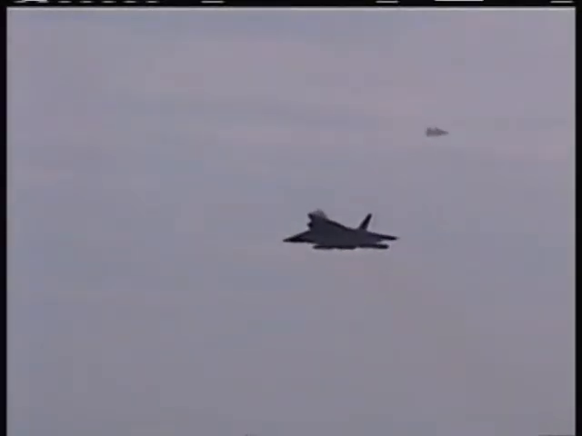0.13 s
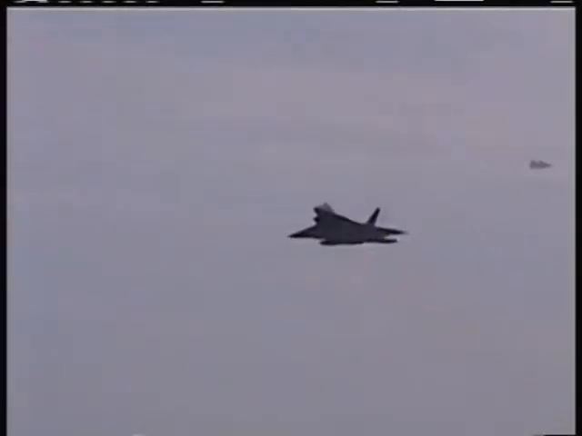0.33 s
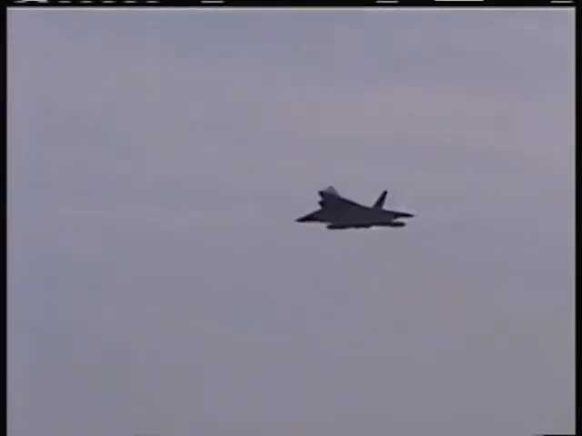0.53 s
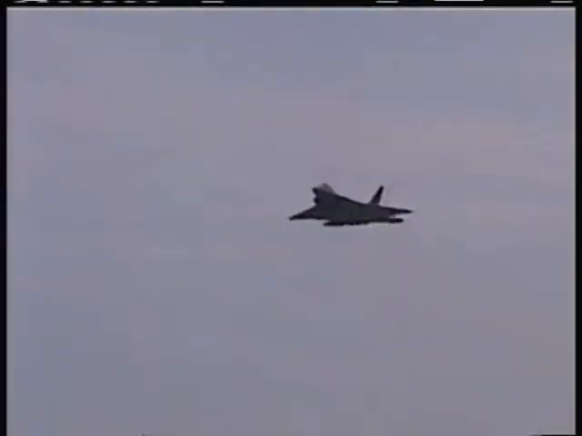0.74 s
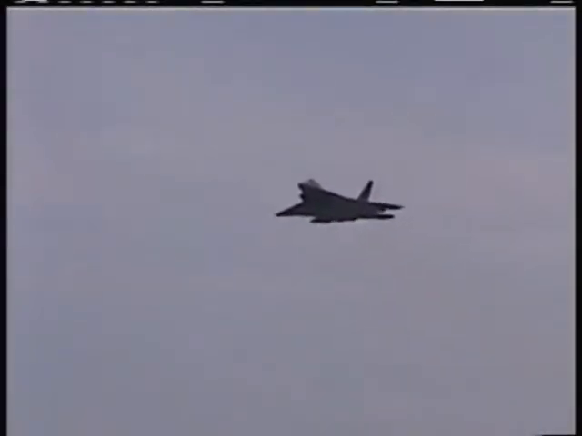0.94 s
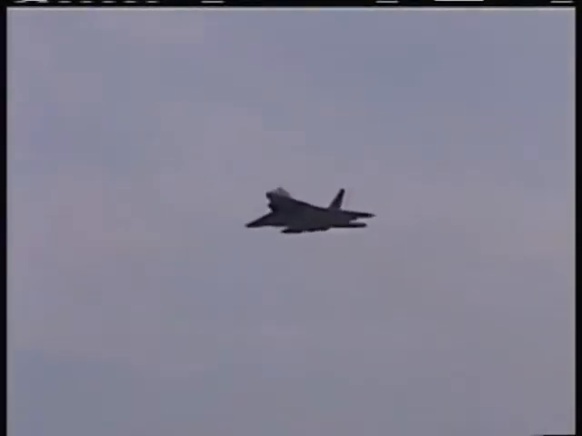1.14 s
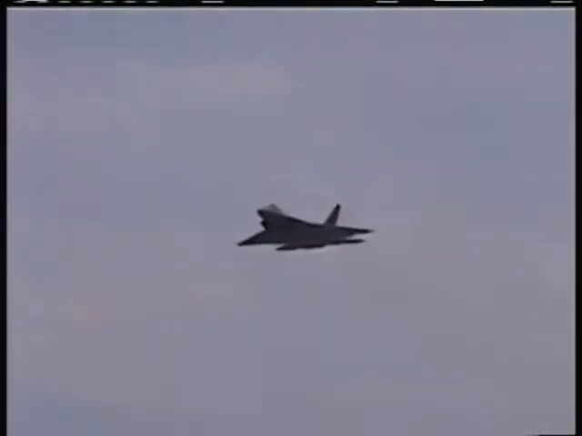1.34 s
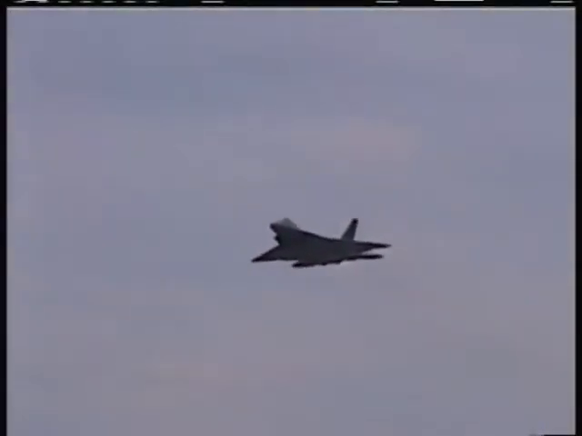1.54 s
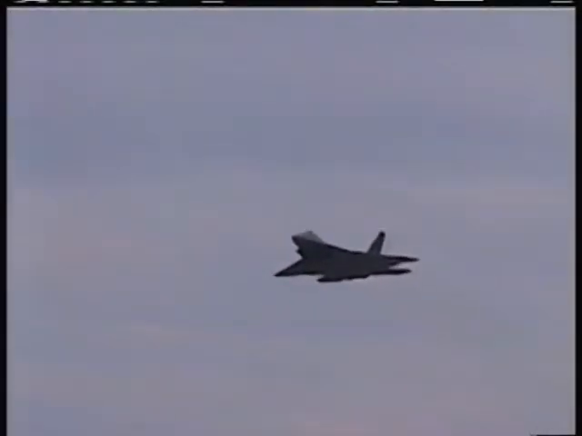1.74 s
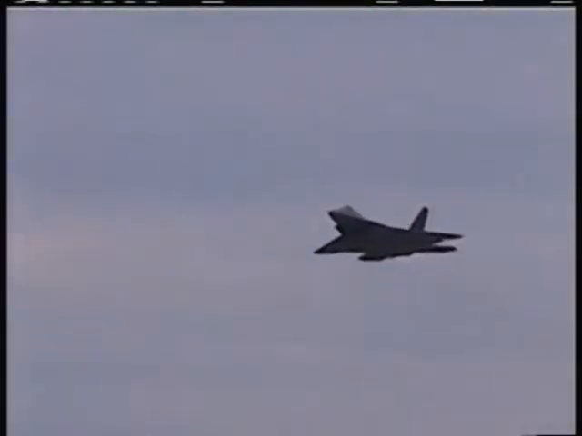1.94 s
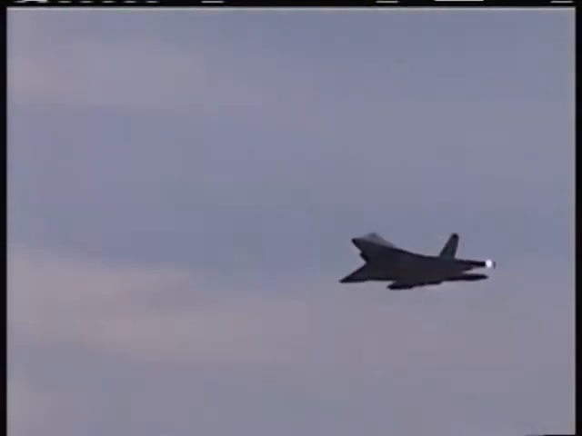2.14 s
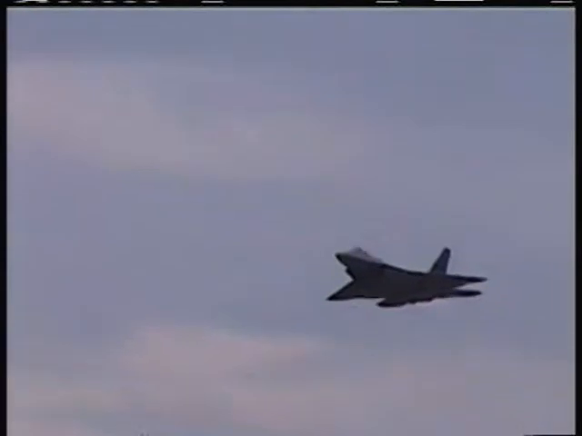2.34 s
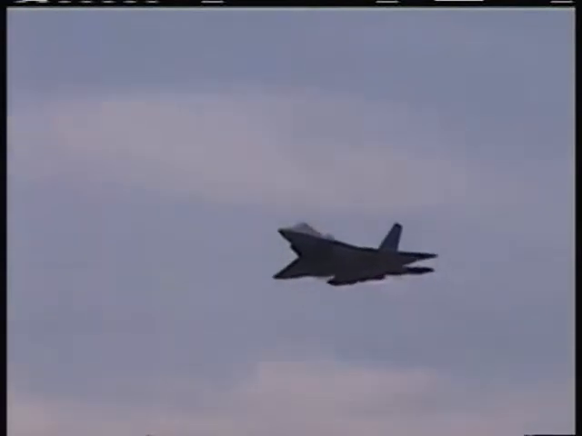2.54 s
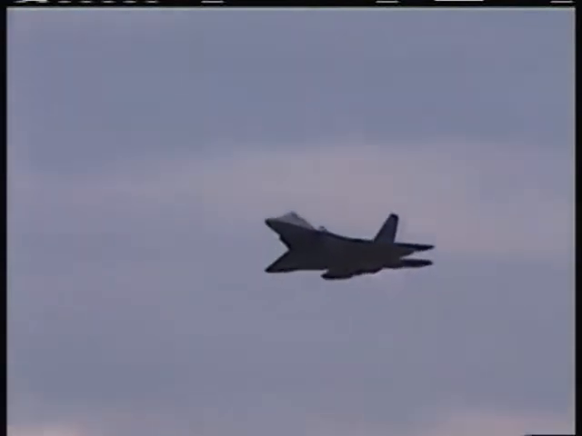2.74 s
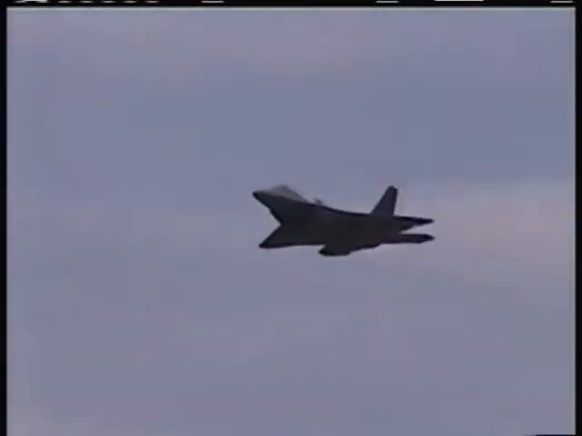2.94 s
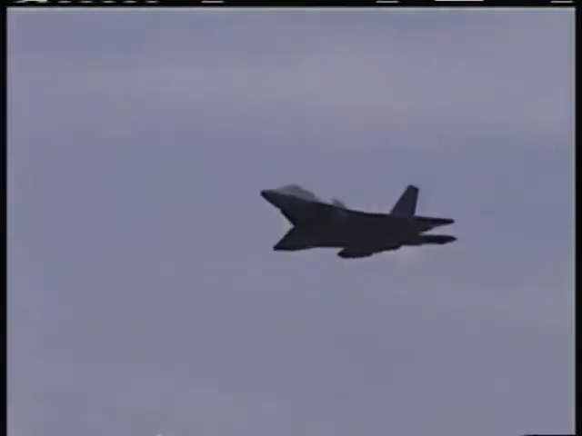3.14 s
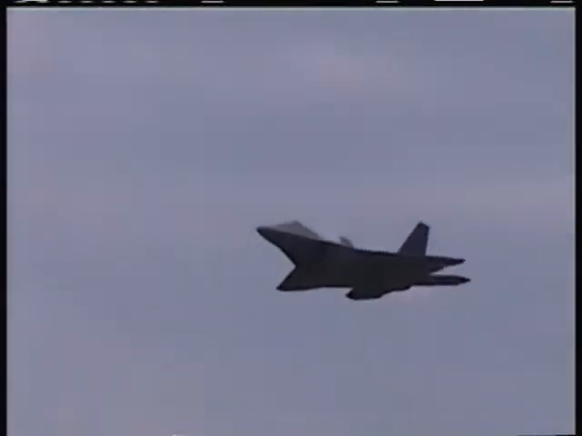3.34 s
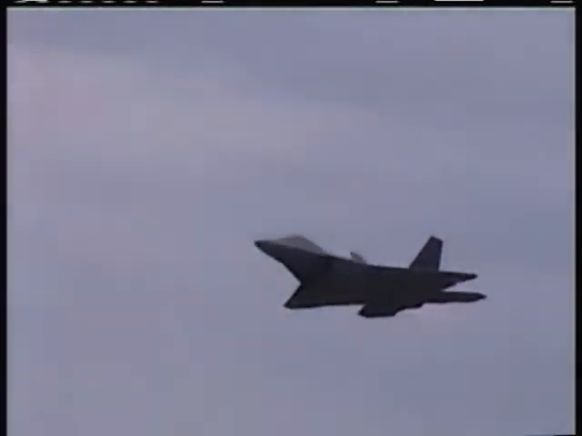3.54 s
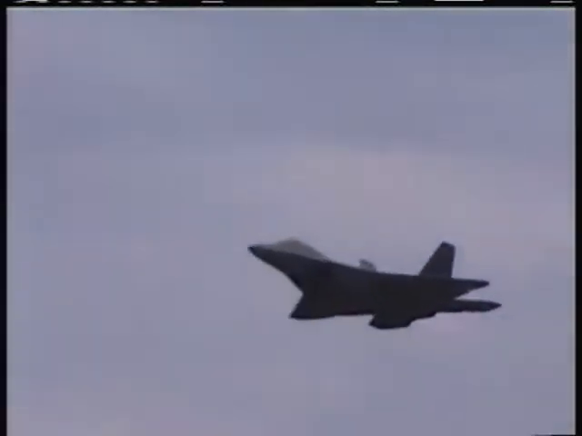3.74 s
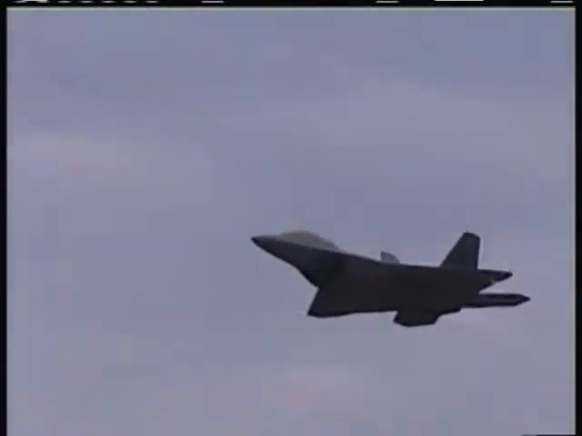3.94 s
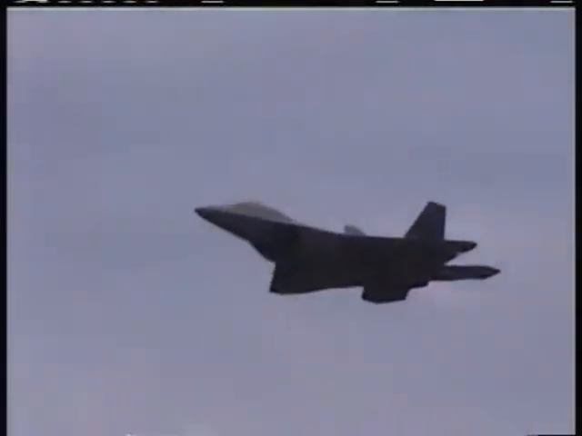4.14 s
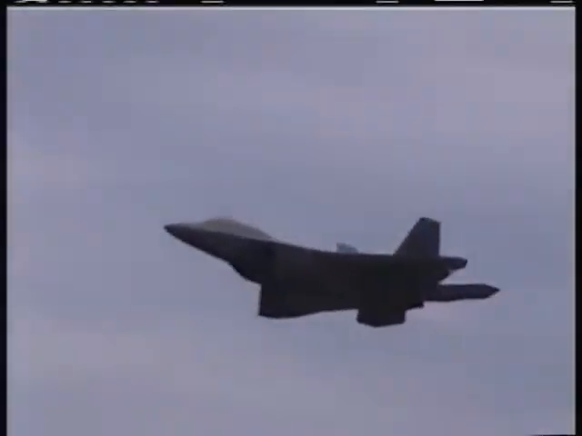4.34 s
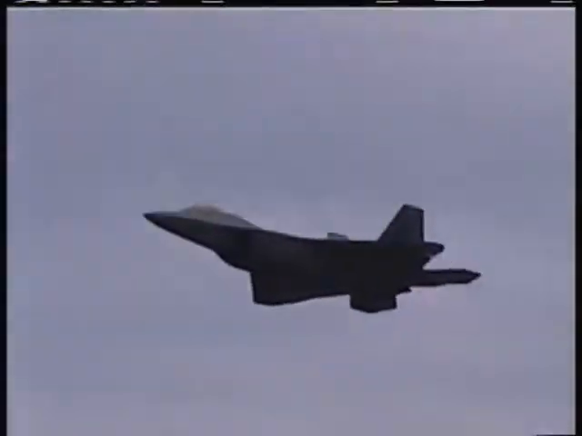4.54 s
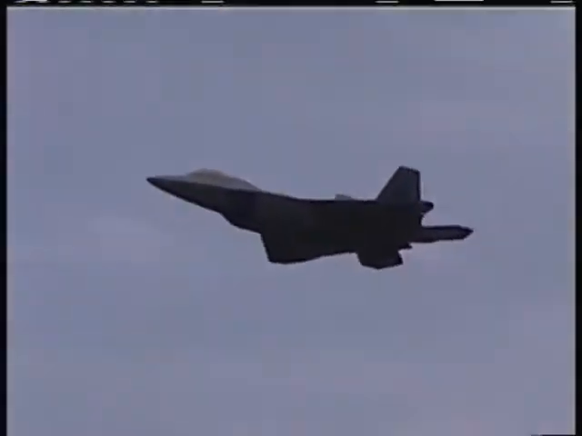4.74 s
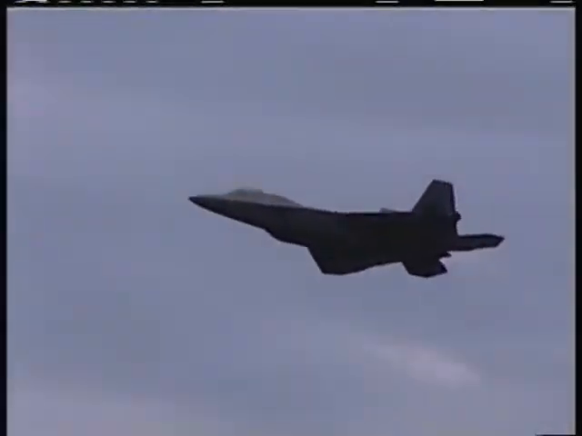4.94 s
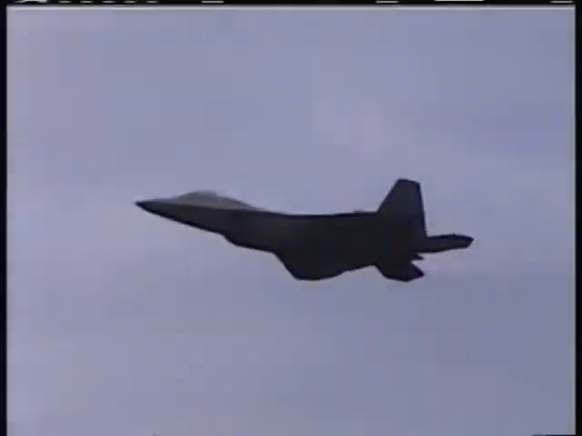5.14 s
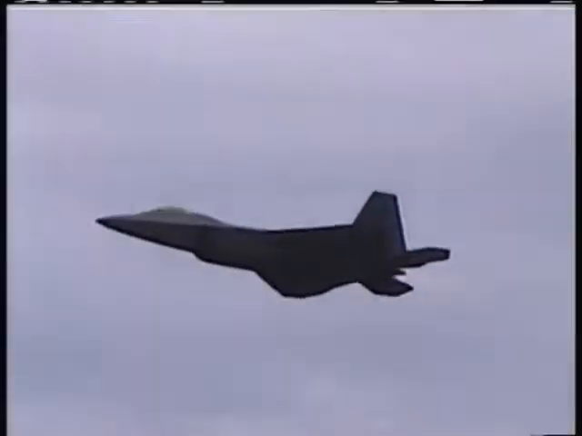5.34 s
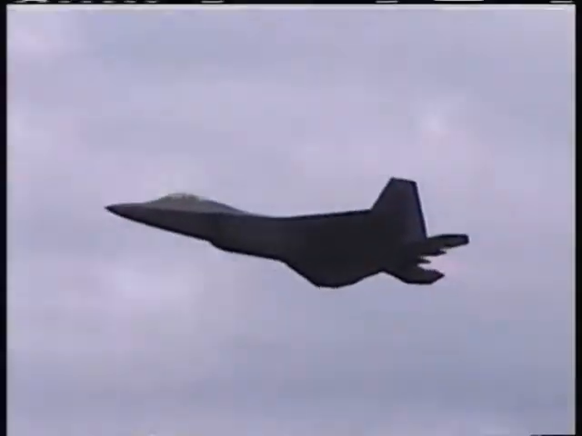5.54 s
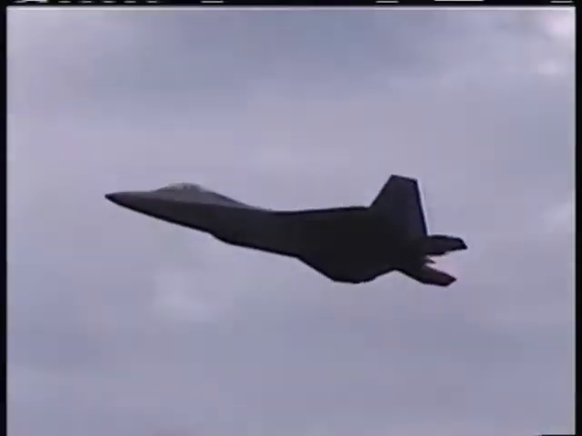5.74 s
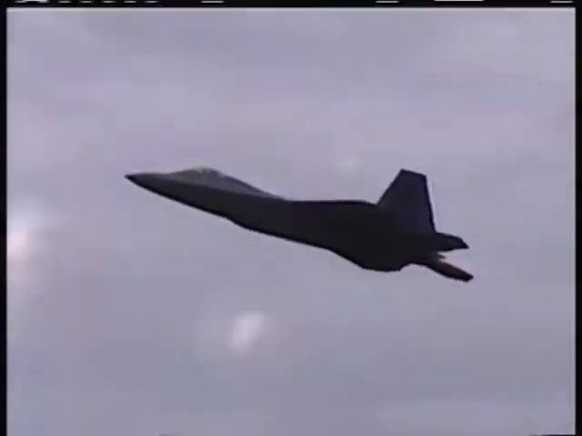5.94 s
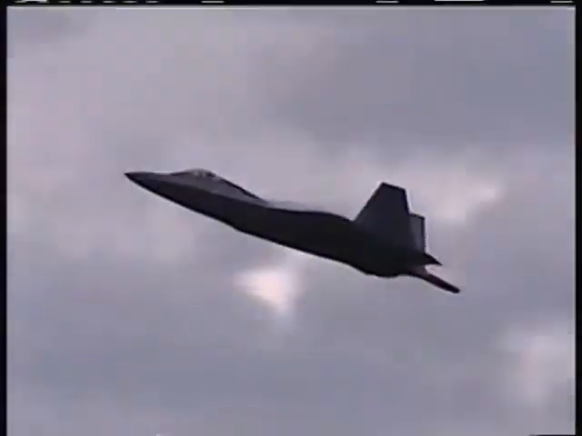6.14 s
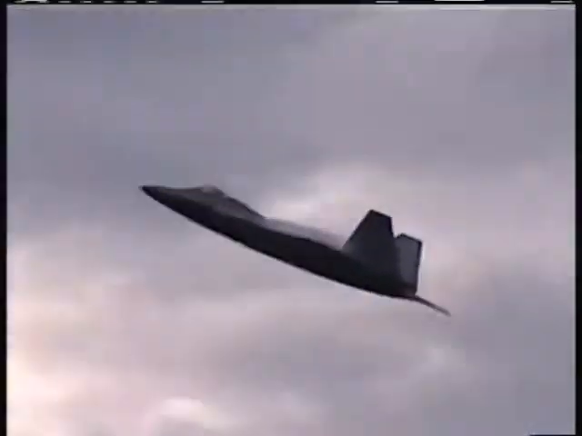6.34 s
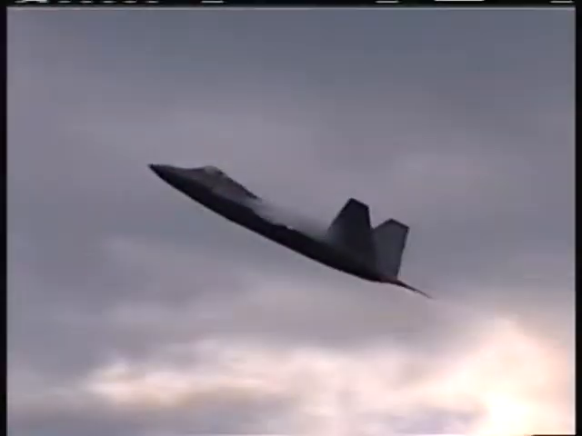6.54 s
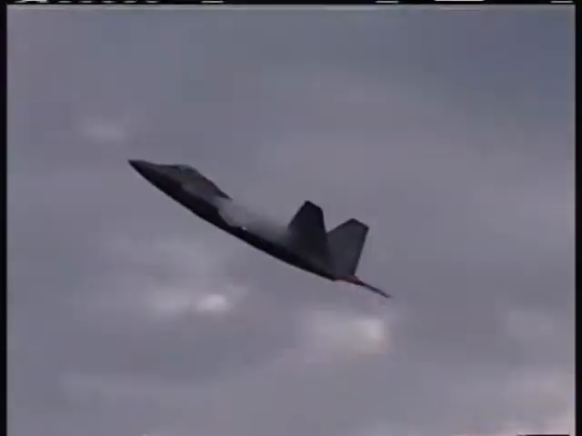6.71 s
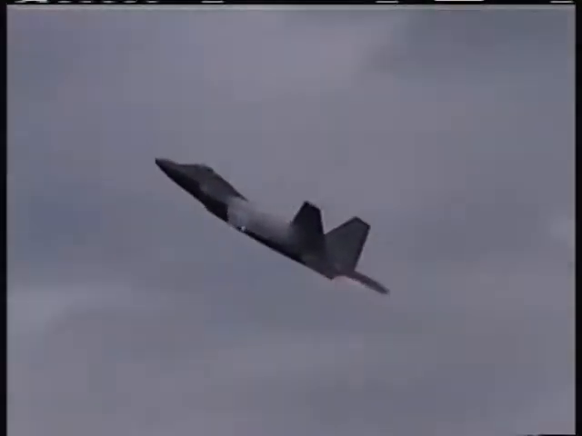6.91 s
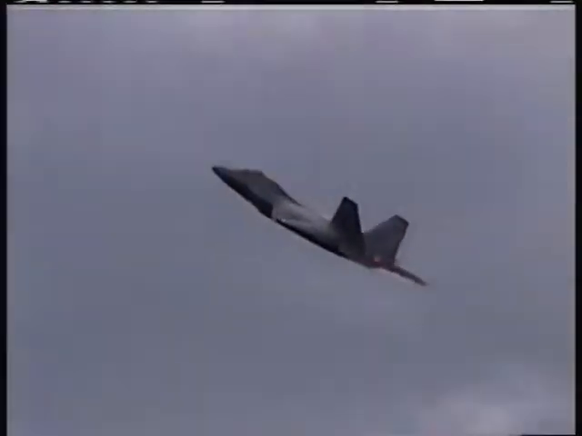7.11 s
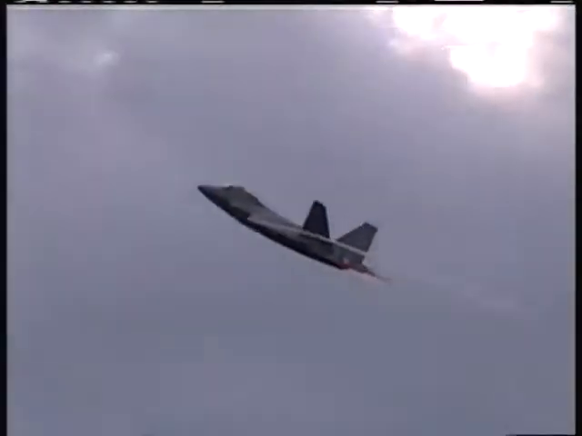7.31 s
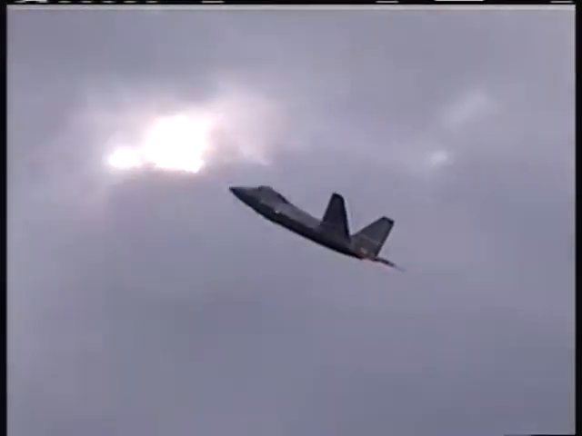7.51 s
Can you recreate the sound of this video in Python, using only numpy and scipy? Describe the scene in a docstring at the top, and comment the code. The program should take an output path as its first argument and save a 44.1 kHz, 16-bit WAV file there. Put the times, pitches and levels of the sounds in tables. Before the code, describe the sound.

Outdoors at an open airfield, a far jet roars dull and throbbing with hollow howling strands. Midway a nearer fighter takes over, its roar brightening with ragged crackles and hard pops as it approaches. It swells to a broad, hollow sweeping roar while pulling up, with low rumble and brief howls. Wind buffets the mono microphone at the beginning and end; faint hiss lies below.

```python
"""Two jets over an airfield

A jet fighter passes low and pulls up; a second, farther jet roars and fades behind it. Mixing noise and one-sided
shocks make each roar; the direct and ground-reflected waves interfere, so a comb of notches sweeps as the aircraft
climbs. Air absorbs the treble, turbulence makes it flicker, and shocks in the exhaust crackle. Howls and rumble are
narrow and low bands of noise; wind buffets the microphone, a bird whistles faintly, tape hiss and thin tones lie below.
"""
import sys
import numpy as np
from scipy import signal
from scipy.fft import rfft, irfft, next_fast_len
from scipy.io import wavfile
from scipy.ndimage import uniform_filter1d

SR = 44100
rng = np.random.default_rng(int(sys.argv[2]) if len(sys.argv) > 2 else 0)


def dump_mix(stems):
    """Bounce the given channels to the path in sys.argv[1] as a 16-bit WAV at rate SR."""
    frames = np.atleast_2d(stems).T  # one column per channel
    limited = np.clip(frames, -1, 1)  # hard clip at full scale
    pcm = np.round(limited * 32767).astype(np.int16)
    wavfile.write(sys.argv[1], SR, pcm)


def volts_from_db(level):
    """Convert decibel levels to linear amplitude ratios."""
    exponent = np.asarray(level, float) / 20
    return 10 ** exponent


N = 338247
SECONDS = np.arange(N) / SR


def rms_one(x):
    """Normalization: scales a signal to unit root-mean-square value."""
    return x / np.sqrt(np.mean(x ** 2) + 1e-20)


def in_time(rows):
    """Linear interpolation: turns the columns of a time table into one value per sample."""
    times, *columns = np.transpose(rows)
    return [np.interp(SECONDS, times, column) for column in columns]


def at_hz(points, hz):
    """Logarithmic frequency axis: reads a spectrum between its tabulated points."""
    table_hz, table_db = np.array(points).T
    return np.interp(np.log(hz + 1), np.log(table_hz), table_db)


def drift(corner_hz):
    """Low-pass random process: noise at every 40th sample through two equal poles, spread 1."""
    pole = np.exp(-2 * np.pi * corner_hz * 40 / SR)
    noise = rng.standard_normal(N // 40 + 2002)
    slow = signal.lfilter([1], [1, -2 * pole, pole ** 2], noise)[2000:]   # drop the settling
    return np.interp(np.arange(N) / 40, np.arange(len(slow)), rms_one(slow))


def band_noise(order, low_hz, high_hz):
    """Band-pass filtering: white noise confined between two frequencies, at unit rms."""
    band = signal.butter(order, [low_hz, high_hz], "bandpass", fs=SR, output="sos")
    return rms_one(signal.sosfilt(band, rng.standard_normal(N)))


def coloured(x, spectrum, low_hz, high_hz):
    """Spectral shaping: weights the spectrum of x so unit white noise has rms 1 between low and high."""
    size = next_fast_len(N)
    hz = np.fft.rfftfreq(size, 1 / SR)
    gain = volts_from_db(at_hz(spectrum, hz))
    inside = (hz > low_hz) * (hz < high_hz)
    gain = gain / np.sqrt(np.mean(gain ** 2 * inside))
    return hz, rfft(x, size) * gain


def through_air(hz, spectrum, band_db):
    """Frequency-dependent transmission: half-octave bands that add up flat each follow a level in time."""
    place, out = 2 * np.log2((hz + 1) / 44), 0
    for k in range(18):
        share = np.cos(np.pi / 2 * np.clip(place - k, -1, 1)) ** 2
        band = irfft(spectrum * share)[:N]
        out = out + band * volts_from_db(band_db(44 * 2 ** (k / 2)))
    return out


def off_ground(x, echo, dull_hz, waver_ms):
    """Two-path interference: direct sound plus a later, duller copy; unsteady air shakes lag and strength."""
    lag_ms, strength = in_time(echo)
    lag_samples = (lag_ms + waver_ms * drift(15)) * SR / 1000
    late = np.interp(np.arange(N) - lag_samples, np.arange(N), x)
    strength = np.clip(strength * (1 + .15 * drift(6)), 0, 1)
    soft = signal.filtfilt(*signal.butter(1, dull_hz, fs=SR), late)
    return (x + strength * soft) / np.sqrt(1 + strength ** 2)


def exhaust(per_s, spread_db, crackle_db):
    """Jet noise: turbulent mixing plus clumped one-sided shocks of uneven size, whose steep fronts rule the treble."""
    sizes = volts_from_db(spread_db * np.minimum(rng.exponential(1, N), 5))
    born = rng.random(N) < per_s * volts_from_db(5.5 * drift(14)) / SR
    pulses = sizes * born
    shocks = rms_one(signal.lfilter([1, -.8], [1], pulses - np.mean(pulses)))
    mixing = rng.standard_normal(N)
    return (mixing - volts_from_db(crackle_db) * shocks) / np.sqrt(1 + volts_from_db(crackle_db) ** 2)


# spectrum of the tape hiss: f/Hz, relative density/dB
HISS_SPECTRUM = [(3820, -21.5), (6500, 0), (7720, 1.5), (8280, 0), (15680, -0.5), (15780, -27)]


def tape_hiss():
    """Broadband noise: random magnetization heard as steady treble hiss."""
    noise = rng.standard_normal(N)
    hiss_db = -77.5   # rms between 7700 and 15000 Hz
    return volts_from_db(hiss_db) * irfft(coloured(noise, HISS_SPECTRUM, 7700, 15000)[1])[:N]


# thin steady tones of the electronics: f/Hz, rms level/dB
WHINE_TONES = [(15734, -95), (10790, -95), (10071, -99)]


def whine():
    """Superposition: pure tones of constant frequency and level add up."""
    return sum(np.sqrt(2) * volts_from_db(db) * np.sin(2 * np.pi * hz * SECONDS) for hz, db in WHINE_TONES)


# buffeting of the microphone, before its lumps: t/s, rms level/dB
WIND_LEVEL = [(0, -37.5), (.3, -41), (.42, -48.5), (.9, -51), (1.3, -56.5), (1.9, -70), (2.5, -63),
              (3.0, -67), (3.5, -61), (4.5, -66), (5.1, -60), (5.6, -50), (6.3, -45.5), (6.8, -48),
              (7.25, -45), (7.5, -42.5), (7.67, -36)]


def wind():
    """Flow noise: turbulent pressure at the microphone, a lumpy low band over a steady deeper one."""
    breeze_db, lumps_db, lumps_hz = -75, 2, 4.7
    breeze = volts_from_db(breeze_db) * band_noise(2, 22, 60)
    buffet_db = in_time(WIND_LEVEL)[0] + lumps_db * drift(lumps_hz)
    return breeze + volts_from_db(buffet_db) * band_noise(2, 62, 130)


# whistle of a faint small bird: t/s, f/Hz, rms level/dB
BIRD_WHISTLE = [(.445, 5300, -95), (.455, 5250, -74), (.48, 5100, -73), (.503, 4800, -74),
                (.512, 4700, -95), (.52, 4700, -140)]


def bird():
    """Frequency modulation: one thin falling whistle, its phase the integral of its frequency."""
    hz, level_db = in_time(BIRD_WHISTLE)
    started = SECONDS > BIRD_WHISTLE[0][0]
    phase = 2 * np.pi * np.cumsum(hz) / SR
    return started * np.sqrt(2) * volts_from_db(level_db) * np.sin(phase)


# longer bounce of the far jet and the rumble, before wavering: t/s, lag/ms, strength (0-1)
LONG_BOUNCE = [(0, 4, 0.07), (.4, 4.6, 0.4), (.9, 4.65, 0.94), (1.25, 4.2, 1), (1.7, 5.1, 0.3),
               (2.3, 5.23, 0.22), (5.5, 9.74, 0.3)]


def long_bounce(x, dull_hz, waver_ms):
    """Interference over a longer path: a low-passed late copy combs mainly the bass."""
    return off_ground(x, LONG_BOUNCE, dull_hz, waver_ms)


# deepest part of both roars, around 180 Hz, before its drift: t/s, level/dB
RUMBLE_LEVEL = [(0, -43), (.4, -48.5), (.7, -49), (1.6, -48.5), (2.1, -52.5), (2.5, -39.5), (2.7, -48),
                (3.7, -53), (4.3, -49.5), (4.65, -43), (5.1, -46), (6.0, -41), (6.5, -41), (6.9, -44),
                (7.35, -33), (7.67, -34)]


def rumble():
    """Scale of turbulence: large eddies far down the plumes give low noise, which takes the long bounce too."""
    eddies = long_bounce(band_noise(3, 125, 255), dull_hz=900, waver_ms=.05)
    return volts_from_db(in_time(RUMBLE_LEVEL)[0] + 2.3 * drift(7.3)) * eddies


# gliding strands, two early and two as the near jet pulls up, before wavering; each: t/s, centre f/Hz, rms level/dB
HOWL_STRANDS = [
    [(.05, 580, -66), (.15, 552.3, -33), (.35, 499, -34), (.6, 444.7, -34.5), (.85, 421.3, -34.5),
     (1.1, 443.3, -40), (1.32, 470, -35.5), (1.45, 485, -63)],
    [(0, 800, -55), (.08, 821, -41), (.2, 850, -34.5), (.32, 922, -45), (.45, 860, -53), (.6, 850, -39),
     (.75, 800, -53), (1.0, 830, -40), (1.2, 950, -44), (1.35, 950, -60)],
    [(5.45, 620, -60), (5.6, 579.6, -35), (5.85, 551.7, -36), (6.15, 563.7, -31.5), (6.35, 520, -28),
     (6.55, 495, -57)],
    [(6.4, 930, -57), (6.55, 879, -35), (6.7, 840, -34), (6.9, 880, -33), (7.1, 920, -38), (7.3, 948, -36),
     (7.5, 950, -50)],
]


def howls():
    """Quadrature modulation: low-passed noise pairs shifted to a moving centre make narrow, gliding roars."""
    width_hz, wobble_hz, flutter_db = 90, 10, 1.5   # the strands waver and break up
    out, low = 0, signal.butter(2, width_hz / 2, fs=SR, output="sos")
    for rows in HOWL_STRANDS:
        hz, level_db = in_time(rows)
        hz = hz + wobble_hz * drift(6)
        level_db = level_db + flutter_db * drift(9)
        a, b = signal.sosfilt(low, rng.standard_normal((2, N)))
        phase = 2 * np.pi * np.cumsum(hz) / SR
        out = out + volts_from_db(level_db) * rms_one(a * np.cos(phase) + b * np.sin(phase))
    return out


# far jet, before its throb: t/s, level at 450 Hz/dB, gain of the upper roar at 800 Hz/dB
FAR_LEVEL = [(0, -42.5, 0), (.12, -36, 6), (.35, -36.5, 2.5), (.6, -34, 3), (.85, -36, -3.5),
             (1.08, -38.5, 9.5), (1.3, -39, -1), (1.55, -41.5, 10.5), (1.85, -35.5, 1.5), (2.1, -36.5, -18),
             (2.3, -40, -7), (2.5, -33, -1.5), (2.9, -41.5, 7), (3.2, -40, 3.5), (3.4, -31, 2),
             (3.75, -36.5, 6.5), (3.95, -34, -2), (4.25, -35, -18), (4.65, -30.5, -10), (4.9, -55, 7)]
# its ground echo, before wavering: t/s, lag/ms, strength (0-1)
FAR_GROUND = [(0, 1.2, 0.13), (.25, 1.92, 0.75), (.55, 1.9, 1), (0.849, 1.96, 0.1), (1.301, 1.97, 0.93),
              (1.7, 2.45, 0.7), (2.05, 2.82, 0.64), (2.3, 2.15, 1), (2.6, 2.55, 0.75), (3.5, 2.43, 0.47),
              (4.0, 2.15, 0.35), (4.8, 2.16, 1)]
# its roar: f/Hz, relative density/dB
FAR_SPECTRUM = [(150, -32), (250, -14.5), (330, -1.5), (400, 3), (600, 0), (900, -4.5), (1320, -16.5),
                (4000, -34.5), (5200, -85.5)]


def far_jet():
    """Distant jet noise: a dull, throbbing roar with little crackle left, combed by two reflections."""
    level_db, upper_db = in_time(FAR_LEVEL)
    source = exhaust(per_s=500, spread_db=3.0, crackle_db=-12)
    throb_db = 1.0 * drift(1.5) + 2.33 * drift(25)

    def band_db(hz):
        """Level of one band: the upper roar enters above 500 Hz, and each band has its own flicker."""
        upper = np.clip(np.log2(hz / 500) * 4.5, 0, 1)
        return level_db + upper * upper_db + throb_db + 1.0 * drift(36)

    roar = through_air(*coloured(source, FAR_SPECTRUM, 330, 640), band_db)
    roar = off_ground(roar, FAR_GROUND, dull_hz=1300, waver_ms=0.092)
    return long_bounce(roar, dull_hz=800, waver_ms=0.037)


# the hardest shocks, as impulses before filtering: t/s, level/dB
HARD_SHOCKS = [(1.9718, -17), (2.8275, -23), (2.993, -20), (3.493, -27), (3.5114, -8), (3.615, -8.5),
               (3.6676, -11), (3.685, -11), (3.785, -11), (3.898, -5.5), (3.828, -14), (4.022, -10),
               (4.156, -14), (4.178, -14), (4.3, -16), (4.61, -14), (4.7, -10), (4.758, -6), (5.0343, -8),
               (5.33, -8), (5.6, -14), (5.7538, -5), (6.0856, -13), (6.981, -2)]


def hard_shocks():
    """Shock waves: each is a sudden drop in pressure, band-limited and rounded by the air."""
    clicks = np.zeros(N)
    clicks[[round(s * SR) for s, db in HARD_SHOCKS]] = -volts_from_db(np.array(HARD_SHOCKS)[:, 1])
    push = signal.sosfilt(signal.butter(2, [700, 3500], "band", fs=SR, output="sos"), clicks)
    return signal.sosfilt(signal.butter(4, 8000, fs=SR, output="sos"), push)


# treble flares and lulls; the one at 0.52 s is a brief tape dropout, applied to the near jet only:
# middle t/s, gain at 5 kHz/dB, length/s
TREBLE_FLARES = [(0.52, -21, 0.015), (1.978, 8, 0.016), (2.345, 1.5, .03), (2.536, 7.5, 0.037),
                 (2.686, -3.5, 0.1), (2.843, 9, 0.023), (3.073, -8, 0.11), (3.506, 14, 0.027),
                 (3.562, 5, .05), (3.65, 7, 0.1), (3.735, -1, 0.06), (3.86, -2, 0.045), (3.812, 5, 0.046),
                 (3.9, 2, 0.018), (4.646, -2.5, 0.097), (4.88, 1, 0.048), (5.042, 6.5, 0.022),
                 (4.04, 5, 0.038), (4.167, 3, 0.07), (4.326, -4, 0.041), (4.434, 4.5, 0.091),
                 (4.517, -8, 0.17), (4.73, 2.5, 0.12), (4.786, -2, 0.036), (5.325, 4.5, 0.035),
                 (3.23, 4, 0.044), (3.31, 1, .03), (3.45, 3, .03), (4.982, 2.5, 0.038), (5.198, 3.5, .04),
                 (5.401, -10, 0.024), (5.56, 4, 0.092), (5.762, 4, 0.022), (6.11, 4.5, 0.061),
                 (6.43, 5, 0.017), (6.493, -11, 0.031), (6.815, 3.5, 0.014), (6.94, -5, 0.085),
                 (7.363, 4.5, 0.041)]


def flares():
    """Amplitude modulation: treble flares and lulls rise and die as smooth humps; dB at 5 kHz over time."""
    t = np.arange(0, N + 40, 40) / SR
    humps = sum(db * np.exp(-(2 * (t - s) / length) ** 4) for s, db, length in TREBLE_FLARES)
    return np.interp(SECONDS, t, humps)


# gain patches of the near roar over time and pitch: middle t/s, centre f/Hz, gain/dB, length/s, width/octaves
ROAR_PATCHES = [(1.43, 1380, 2.5, 0.34, 0.82), (1.9, 1500, 7.5, 0.17, 0.64), (2.805, 1180, 16.5, .15, 1.3),
                (3.85, 1300, -11, 0.18, 0.42), (3.91, 2850, 4, 0.39, 0.36), (3.5, 1100, 8.5, 0.1, 1.5),
                (2.2, 2300, -3, .8, .6), (.3, 3000, 3, .9, .6), (6.3, 800, -3, .25, .4),
                (5.65, 290, -3, .5, .4), (4.55, 4000, 2, .4, .5), (4.15, 830, 2.5, .25, .7),
                (4.05, 5300, 2, .2, 0.65), (4.9, 6500, 1.5, 0.27, 0.73), (0.49, 600, 3, .3, .4),
                (4.33, 2800, -6.5, 0.06, 2.5), (4.04, 3200, 2.5, 0.068, 0.97),
                (3.18, 2500, -3.5, 0.19, 0.91), (4.44, 630, -4, 0.23, 0.66), (4.5, 3200, 3, 0.065, 1.0),
                (7.35, 265, 5.5, .8, .5), (5.4, 360, 5, .4, .4), (6.7, 620, 1.5, .4, .4),
                (.75, 270, -10, 1.1, .6), (4.397, 1720, 7.5, 0.29, 0.64), (4.8, 1500, 3.5, 0.12, .8),
                (5.02, 1030, 5, 0.13, 1.1), (3.9, 750, -5, 0.047, 2.4), (5.215, 860, 7, 0.15, 0.97),
                (6.5, 800, -3, 0.039, 1.3), (6.2, 650, 6, 0.11, 0.58), (5.88, 325, -7.5, 1.1, 0.57),
                (6.302, 830, -1.5, 0.34, .6), (7.3, 884, 2, 0.36, .6)]


def roar_patches(hz):
    """Time-frequency weighting: sums the Gaussian gain patches at one pitch, in dB over time."""
    t = np.arange(0, N + 40, 40) / SR
    humps = 0
    for s, centre_hz, db, length, wide in ROAR_PATCHES:
        pitch_offset = 2 * np.log2(hz / centre_hz) / wide
        humps = humps + db * np.exp(-(2 * (t - s) / length) ** 2 - pitch_offset ** 2)
    return np.interp(SECONDS, t, humps)


# near jet, before flicker and patches: t/s, level at 2 kHz/dB, gain of the air at 5 kHz/dB, gain of the low roar/dB
NEAR_LEVEL = [(0, -50, -14.5, 4), (.6, -46, -17, -6.5), (1.22, -49.5, -16, 3.5), (1.43, -44, -19.5, -5),
              (1.62, -53.5, -7, 8.5), (1.92, -46, -17, -4), (2.2, -44, -17, -2.5),
              (2.65, -47.5, -10.5, 0.5), (2.8, -51.5, -7.5, 0), (2.95, -45, -11.5, 1.5),
              (3.4, -42.5, -11, -3), (3.8, -39.5, -4, -1.5), (4.2, -38, -6.5, 2), (4.6, -38, -1, 0.5),
              (5.0, -36, -4.5, 0), (5.22, -36.5, -2, 1.5), (5.38, -33.5, -5, -5), (5.55, -30.5, -2.5, -1),
              (5.8, -31, -2, -2), (6.15, -27.5, -2.5, 0), (6.6, -29, -1, -1.1), (7.0, -28.5, -0.5, -1),
              (7.67, -30.5, -2, -1)]
# bass gain, in full below about 420 Hz; ground cancellation thins it early: t/s, gain/dB
BASS_GAIN = [(0, -29.5), (1.4, -5), (2.5, -6.5), (4.5, 1), (5.0, -2.5), (5.3, 1.5), (5.6, 7.5), (5.95, 0),
             (6.25, 0), (6.45, -8), (6.65, -3.5), (6.9, -6), (7.2, 3), (7.67, 3.5)]
# shocks against mixing noise, before the flares: t/s, ratio/dB
SHOCK_SHARE = [(0, -14), (1.5, -13), (2.5, -11), (3.3, -7), (3.55, 2), (4.2, 2), (4.9, 3), (5.5, 1),
               (6.5, 0), (7.67, -1)]
# its roar: f/Hz, relative density/dB
NEAR_SPECTRUM = [(140, -58.5), (240, -25.5), (284, -4.5), (390, -4.5), (500, -2), (699, -3), (929, -3.5),
                 (1150, -9), (1300, -8), (4620, -27), (13000, -58.5)]
# its ground echo, before wavering: t/s, lag/ms, strength (0-1)
NEAR_GROUND = [(0, .2, .3), (3.3, .24, .5), (3.75, .38, .85), (4.0, .46, .8), (4.15, .55, .6),
               (4.55, .64, .65), (4.9, .77, .6), (5.05, 1.0, .35), (5.2, 1.15, .4), (5.5, 1.39, .75),
               (5.8, 1.76, .75), (6.1, 1.86, .85), (6.4, 2.15, .6), (6.55, 2.34, .55), (6.7, 2.41, .75),
               (6.85, 2.35, .6), (7.0, 2.23, .45), (7.15, 2.15, .45), (7.45, 2.08, .4), (7.67, 2.06, .35)]


def near_jet():
    """Absorption and scattering: air takes more the higher the pitch; eddies make the treble flicker together."""
    level_db, air_db, low_db = in_time(NEAR_LEVEL)
    bass_db = in_time(BASS_GAIN)[0]
    flare_db = flares()
    # shocks stand out more in a flare, by .45 dB per dB
    source = exhaust(per_s=800, spread_db=3.6, crackle_db=in_time(SHOCK_SHARE)[0] + .45 * flare_db)
    together = 2.0 * drift(20) + 2.9 * drift(100)

    def band_db(hz):
        """Level of one band: air loss above 2100 Hz, low roar below 1500, bass below 650, and flicker."""
        high = (max(hz - 2100, 0) / 2900) ** 0.95
        low = np.clip(np.log2(1500 / hz), 0, 1)
        bass = np.clip(np.log2(650 / hz) * 1.6, 0, 1)
        flicker = np.clip(hz / 3000, .6, 1.2) * 0.58 * together + 0.4 * drift(3.85)
        flare = (hz / 5000) ** 0.45 * flare_db   # the swing grows with pitch
        return level_db + high * air_db + low * low_db + bass * bass_db + flicker + flare + roar_patches(hz)

    roar = through_air(*coloured(source, NEAR_SPECTRUM, 1641, 2430), band_db)
    return off_ground(roar + hard_shocks(), NEAR_GROUND, dull_hz=3200, waver_ms=0.05)


def scene():
    """Superposition of sources: wind, bird, rumble, howls and two jets, in mono."""
    return (wind() + bird() + rumble() + howls() + far_jet() + near_jet())[None]


def gain_control(x, knee_db, ratio, hold_ms):
    """Dynamic compression: whatever the short-time level has above the knee is turned down."""
    hold = int(hold_ms * SR / 1000)
    level_db = 10 * np.log10(uniform_filter1d(x ** 2, hold) + 1e-12)
    cut_db = (1 - 1 / max(ratio, 1)) * np.maximum(level_db - knee_db, 0)
    return x * volts_from_db(-uniform_filter1d(cut_db, hold))


def top_cut(x):
    """Nothing passes above the cut-off."""
    return signal.sosfilt(signal.butter(12, 16600, fs=SR, output="sos"), x)


def record(dry):
    """Nonlinear pickup: peaks are held down and rounded, the top rolls off; hiss and whine join."""
    held = gain_control(dry, knee_db=-28, ratio=2.5, hold_ms=4.0)
    rounded = .17 * np.tanh(held / .17)
    picked = signal.sosfilt(signal.butter(4, 11000, fs=SR, output="sos"), rounded)
    return top_cut(picked + tape_hiss() + whine())


dry = scene()
out = record(dry)
dump_mix(out)
```